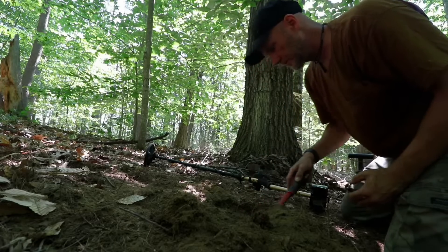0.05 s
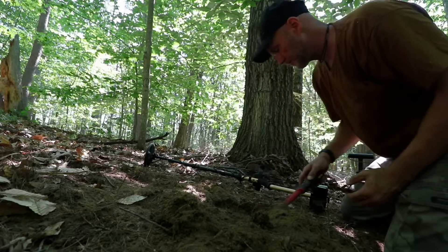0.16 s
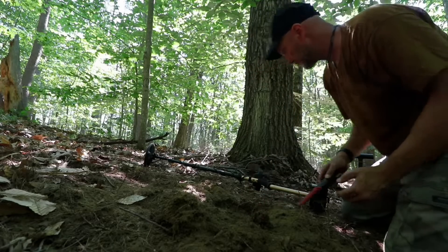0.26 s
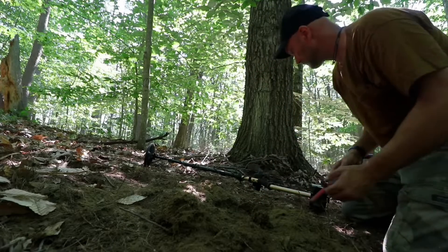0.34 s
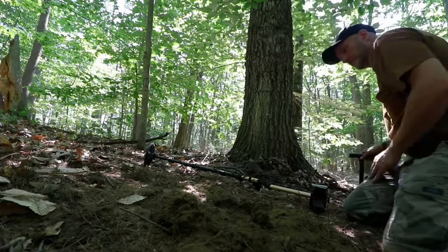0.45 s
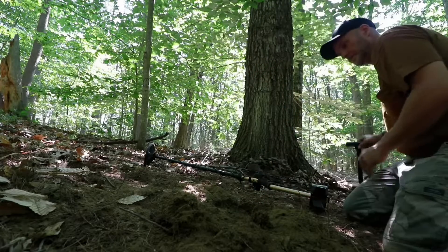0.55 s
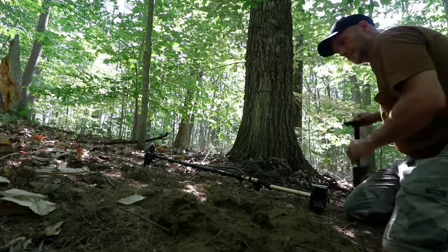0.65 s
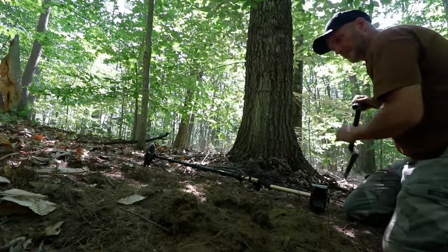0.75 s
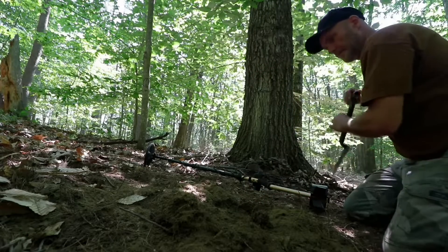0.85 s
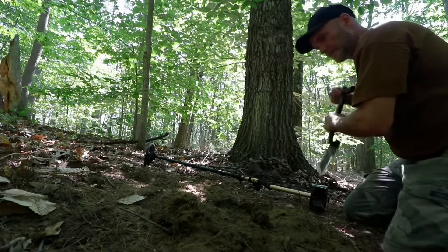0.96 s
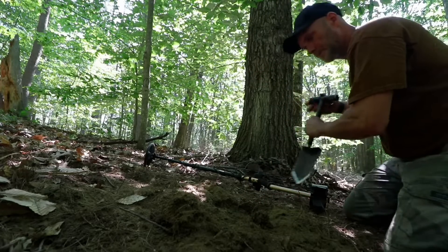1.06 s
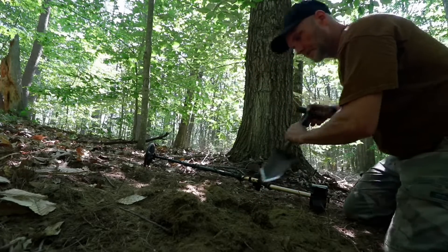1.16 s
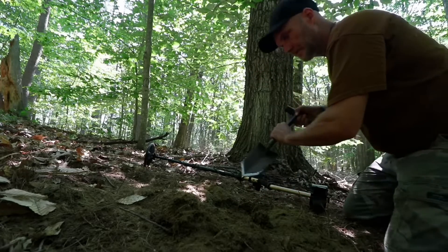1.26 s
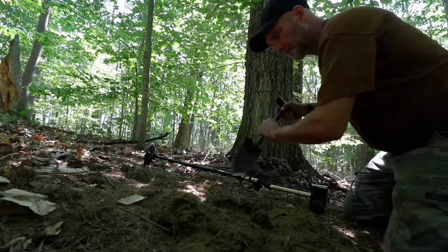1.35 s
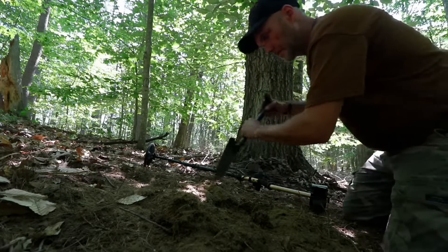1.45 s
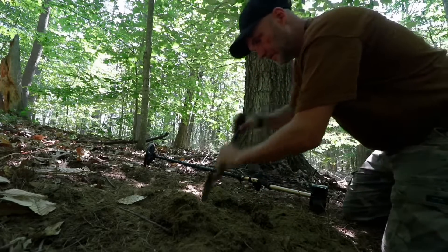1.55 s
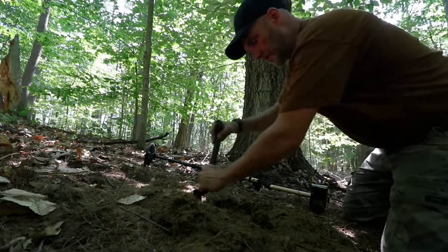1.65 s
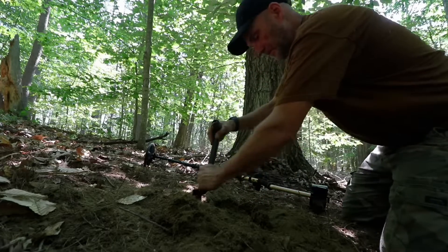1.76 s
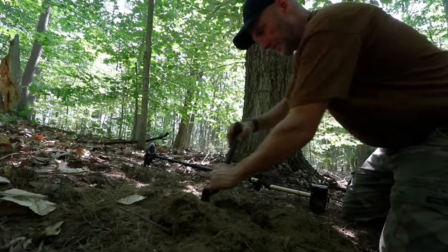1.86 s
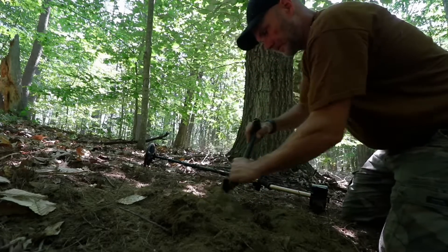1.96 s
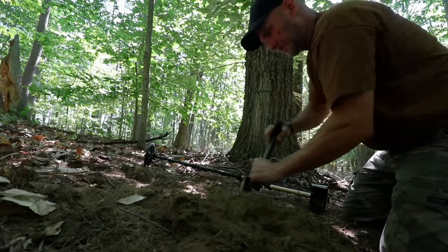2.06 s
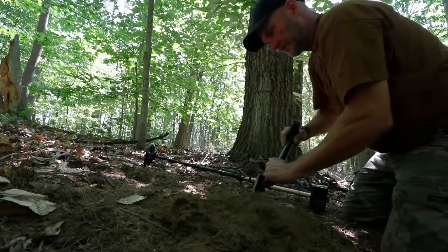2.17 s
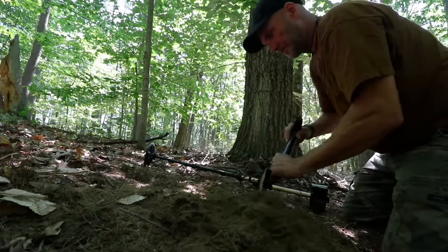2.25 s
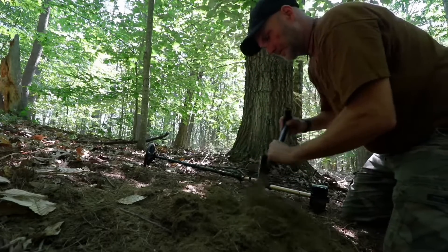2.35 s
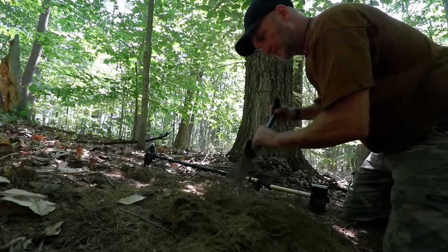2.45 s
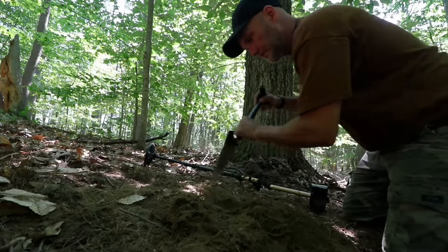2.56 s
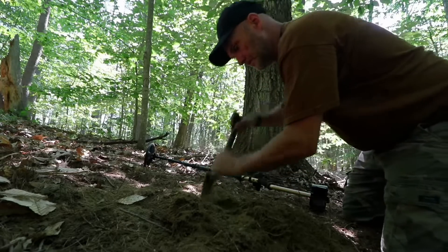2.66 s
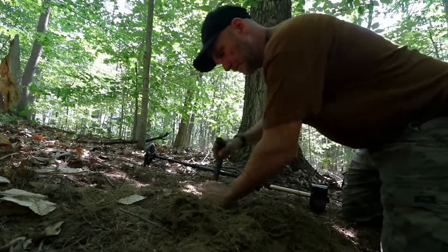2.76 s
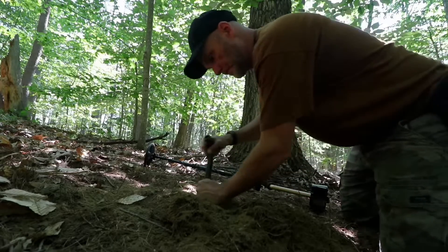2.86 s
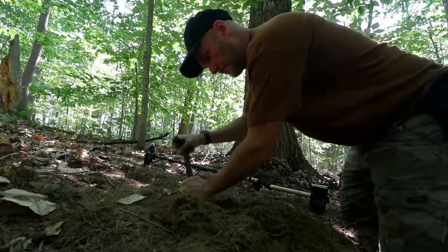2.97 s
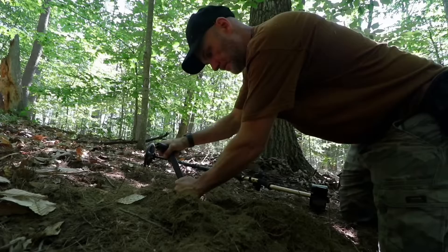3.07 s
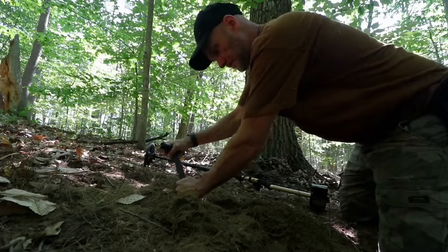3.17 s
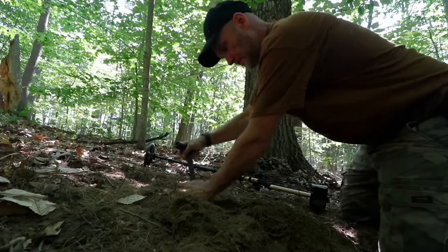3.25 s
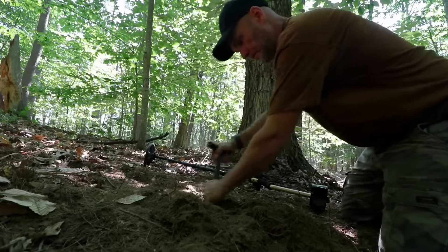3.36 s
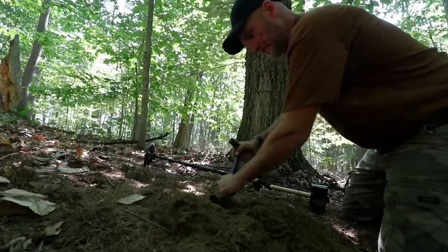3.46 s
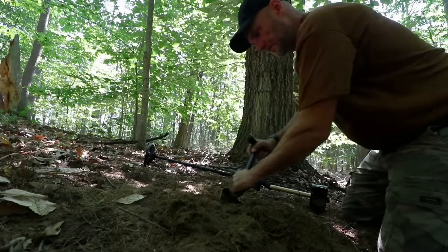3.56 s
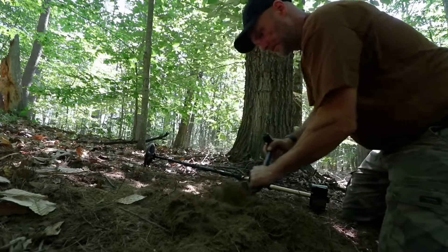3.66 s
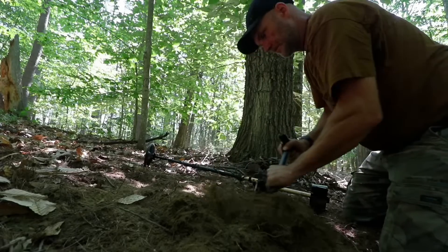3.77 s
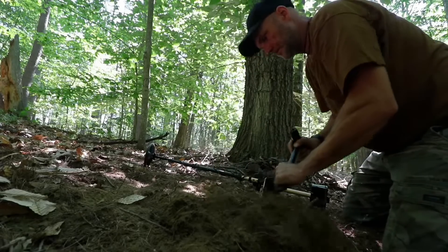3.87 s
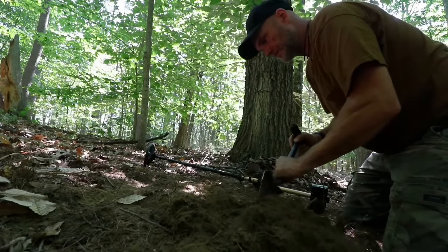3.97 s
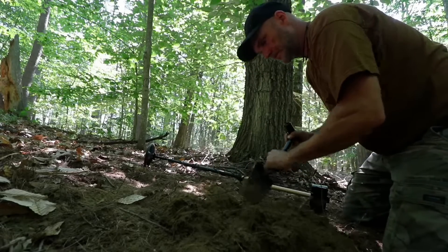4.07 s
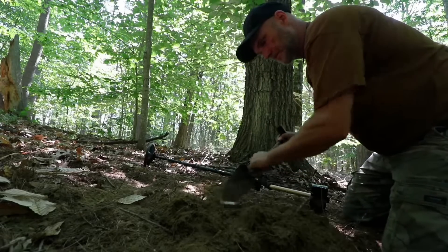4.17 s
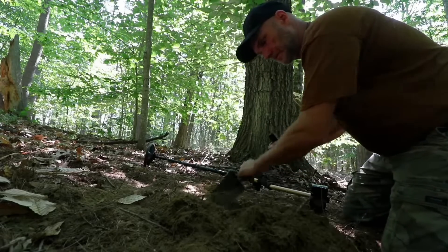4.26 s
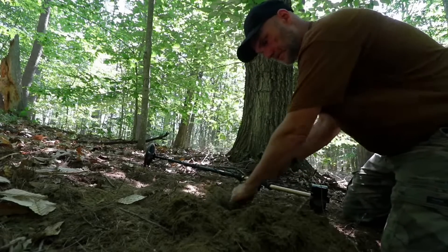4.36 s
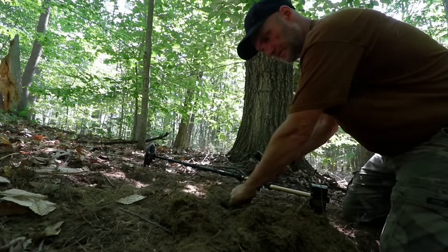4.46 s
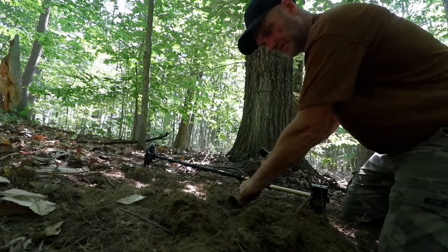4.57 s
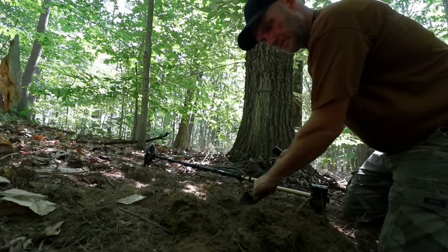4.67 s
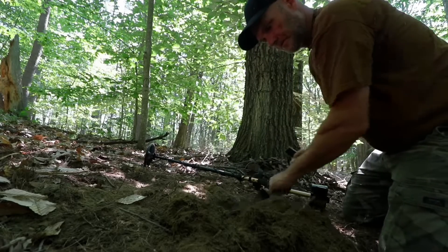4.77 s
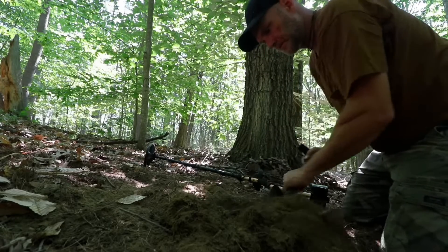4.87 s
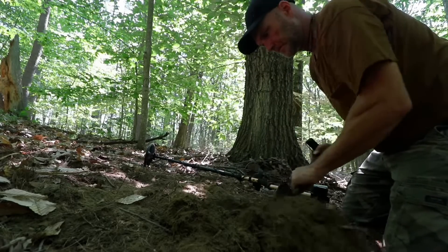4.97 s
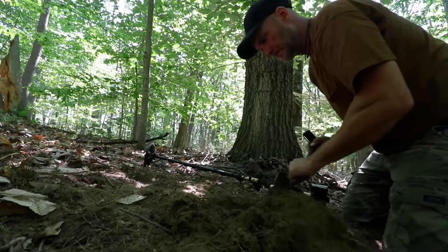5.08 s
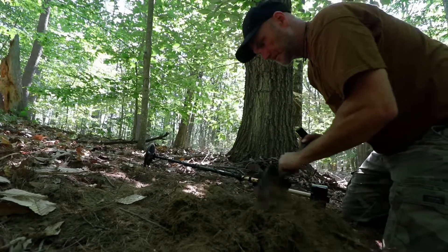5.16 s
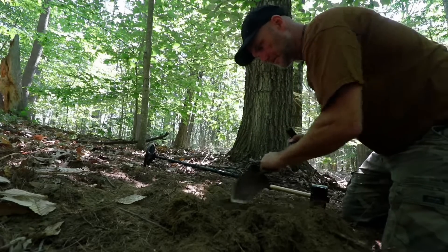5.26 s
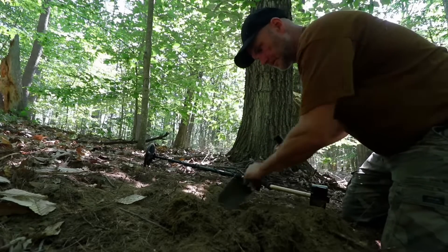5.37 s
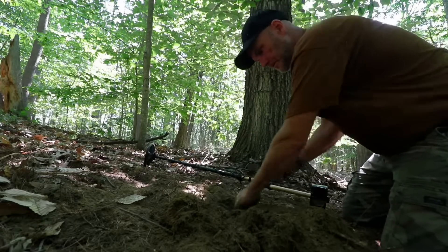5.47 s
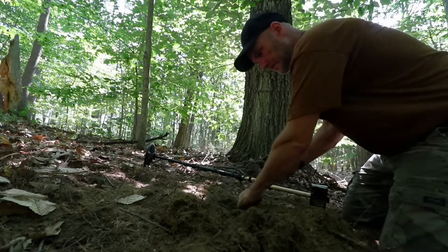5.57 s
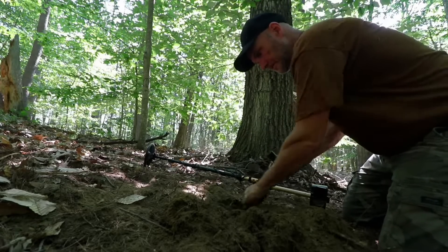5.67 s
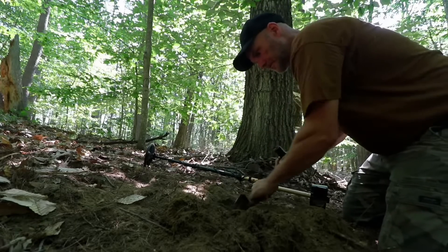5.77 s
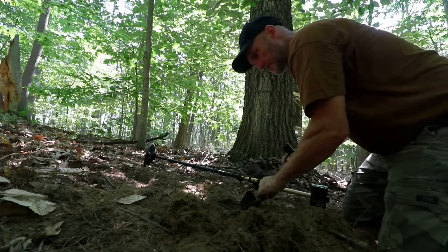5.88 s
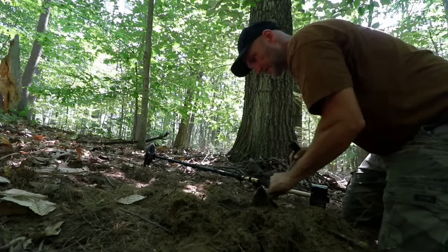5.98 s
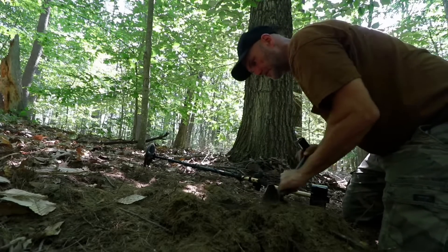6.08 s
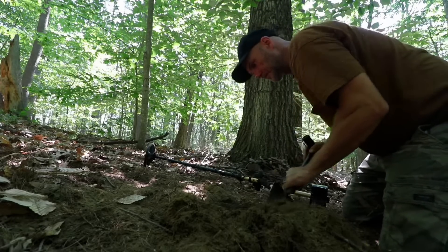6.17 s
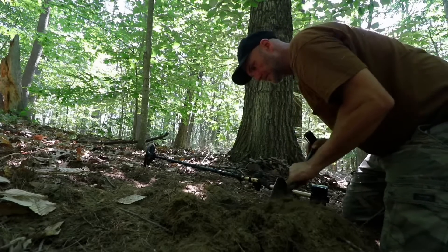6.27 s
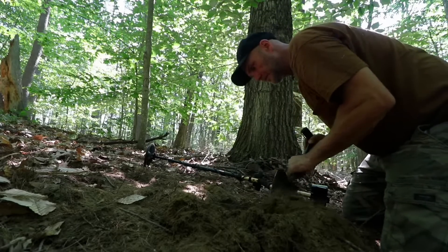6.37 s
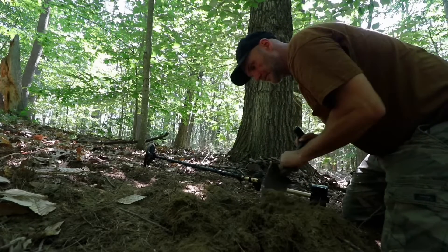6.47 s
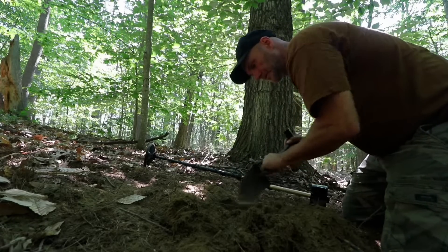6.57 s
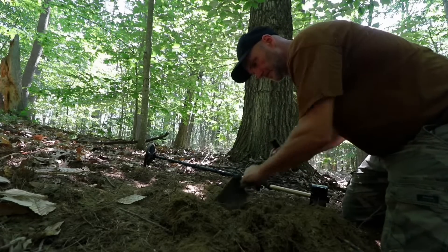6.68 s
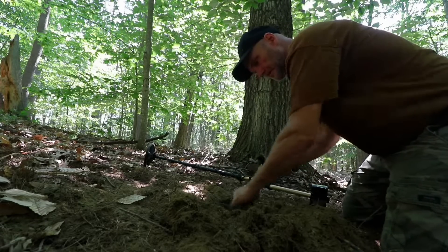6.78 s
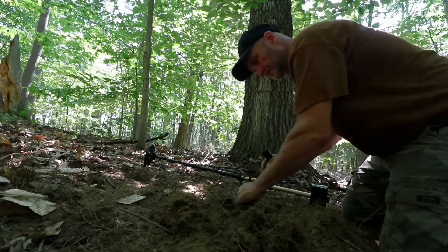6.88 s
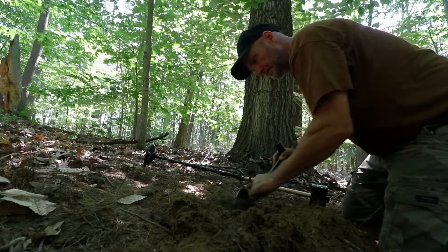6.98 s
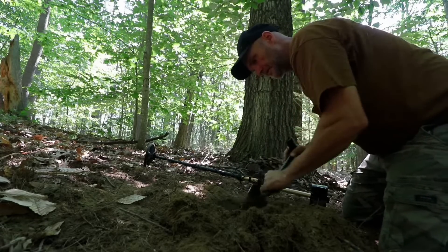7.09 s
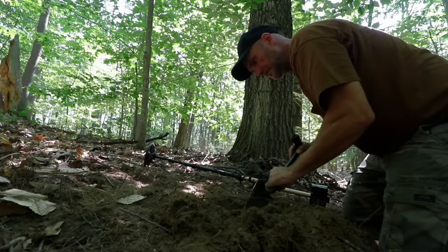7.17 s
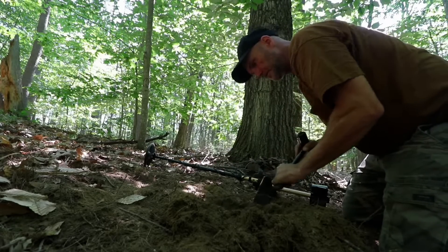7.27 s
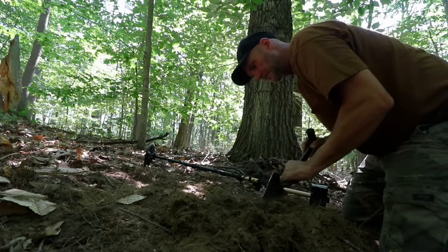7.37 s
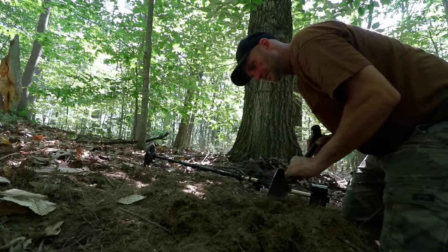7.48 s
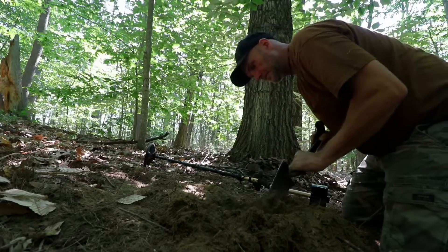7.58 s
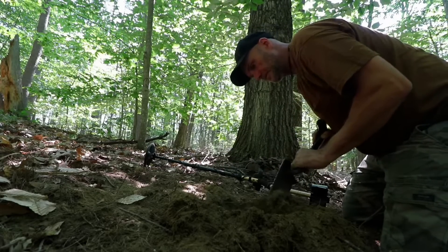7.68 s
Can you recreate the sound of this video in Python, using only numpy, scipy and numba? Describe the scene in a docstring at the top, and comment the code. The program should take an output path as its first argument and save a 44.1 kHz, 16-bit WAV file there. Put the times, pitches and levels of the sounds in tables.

```python
"""Spade in stony woodland soil

A short steel spade chops, levers and scrapes stony soil a metre from a microphone on the ground.
Stones excite the blade's modes, which ring long in air and short in soil; random grit grinds along it.
Thuds are decaying swings of sagging pitch, with a low shudder under them. Filtered noise gives leaves and
air, insects near 3.5 kHz and a faint wavering hum; two short sine whistles sound. Gain ducks on loud sound."""
import sys
import numpy as np
from scipy import signal
from scipy.fft import rfft, irfft, next_fast_len
from scipy.io import wavfile
from scipy.ndimage import uniform_filter1d
from numba import njit

SR = 44100
rng = np.random.default_rng(int(sys.argv[2]) if len(sys.argv) > 2 else 0)


def materialize(psi):
    """Save the field psi as 16-bit PCM at rate SR to the path in sys.argv[1].

    A 1-D psi becomes a single channel; in a 2-D psi each row is a channel.
    """
    bounded = np.clip(np.atleast_2d(psi).T, -1, 1)
    quanta = np.round(bounded * 32767).astype(np.int16)
    wavfile.write(sys.argv[1], SR, quanta)


N = 340893

# All levels are those ahead of the gain control.
# Modes of the spade, handle first. Each row: nominal pitch in Hz, relative level in dB, longest t60 in s (in air).
BLADE_MODES = [(484, -5, .04), (670, -6, .04), (915, -4, .06), (1350, -6, .07), (1540, -7, .17),
               (2205, -3.5, .2), (2555, -4, .27), (3460, -7, .1), (4075, -10, .2), (4560, -13, .15),
               (5115, -4, .15), (5380, -9, .2), (5780, -14, .12), (6630, -5, .25), (7740, -12, .15),
               (8310, -14, .1), (9265, -16, .15), (10070, -13, .1), (11200, -18, .07), (11940, -16, .1),
               (13500, -15, .06), (13880, -22, .06)]
# Stones against the blade in soil. Each row: start in s, clink peak in dB, knock in dB re clink,
# sizzle in dB re clink, then one or more pitches in Hz that the struck spot favours.
SOIL_BLOWS = [(0.9173, -31.5, -28, -27, 3500), (1.561, -10, -3.5, -11, 3380),
              (1.5643, 3.5, -11, -7, 2275, 3460), (1.5847, -10, -1.5, -29, 4000),
              (1.5996, -16, -26, -4, 2400), (1.644, -24.5, -19, -23, 1740), (1.833, -39, -9, -14, 2260),
              (1.943, -35.5, -20, 11, 3700), (1.9587, -28, 2, -31, 2360),
              (2.688, 5, -8, 4.5, 2600, 5115, 6630), (2.6965, 0.5, -17, -43, 3960),
              (2.709, -32, 6, -22, 4000), (3.2504, -29.5, -2, -29, 3160), (3.2687, -34.5, 6, -21, 2090),
              (3.299, -32, -27, -27, 2060), (3.318, -29.5, -20, -21, 2020), (3.4619, -25.5, 2, -12, 2900),
              (3.475, -14, -2, -29, 2930), (3.493, -20.5, -2, -6, 3000), (3.5323, -18.5, -32, -2, 3120),
              (3.538, -19, -25, -15, 3230), (3.546, -17, -25, -15, 3200), (3.553, -20, -34, -28, 3240),
              (3.6208, -10.5, -4, -8.5, 2360), (3.886, -36, -20, -6, 3200), (3.965, -29, -14, -8, 1690),
              (4.3597, -0.5, -15, -19, 1540, 3460, 4560), (4.365, -3, -20, -21, 2300, 4560, 1540),
              (4.372, -12, -25, -18, 1550, 3460), (4.3974, -21, -10, -36, 1510, 3400),
              (4.5408, -23, -12, -5, 1600), (4.6254, -26, -7, -7, 1520), (4.6726, -19, -2, -29, 1620),
              (4.7168, -37.5, 3, 12, 1560), (5.056, -30, -21, -16, 3020), (5.4637, -13, -14, 0, 3300),
              (5.4665, -5, -25, 5, 3300, 6630, 9265), (5.472, -10, -11, -7, 2480), (5.485, -20, 1, 1, 3300),
              (5.501, -25, -1, -3, 3300), (5.5978, -24, -6, -25, 1330), (5.7517, -37, 6.5, 8.5, 1240),
              (5.61, -26, -1, -28, 1380), (5.9576, -22, 4.5, -7, 1530), (5.971, -35, -5, -25, 1500),
              (6.031, -27, -18, -25, 1440), (6.204, -51, -18, 19.5, 4450), (6.2548, -34, 0.5, 1, 5270),
              (6.2981, -28.5, -3, 2, 1300), (6.323, -25, -27, -7, 2350), (6.348, -27.5, -5, 4, 5360),
              (6.7781, 3, -6, -5, 3470), (6.783, -8, -14, -6, 5400, 1540), (6.802, -6, -10, -9, 1550),
              (6.8724, -15.5, -36, -9, 2940), (6.897, -21, -7, -4, 2900, 5400),
              (6.854, -19, -22, -20, 3000), (6.916, -21.5, -12, -6, 2980), (6.987, -22.5, -21, 8, 8300),
              (6.9974, -16, -22, -1.5, 6950, 5400, 2900), (7.033, -22, -12, -6, 2380, 7000, 5400),
              (7.05, -28, -15, -8, 3000), (7.113, -21, 2.5, -7, 1450), (7.1232, -10.5, -6, -15, 2320),
              (7.153, -17, -2, -5, 2360), (7.1616, -10, -3, -10, 2640, 5400), (7.179, -23, -16, 6, 2400),
              (7.1919, -14, -8, -6, 1440), (7.222, -26.5, 8.5, -3, 1530), (7.244, -19.5, -26, -31, 2450),
              (7.3, -33, -25, -2, 1550), (7.311, -30, -10, -2, 1500), (7.368, -35, -14, -12, 2300),
              (7.456, -27, -1, 1.5, 2330), (7.4917, -25, -4, 2, 5300), (7.5047, -15.5, -2, 1, 2300),
              (7.5345, -21, -3, 4, 3430, 6630), (7.5621, -8, -6, -9, 2200, 484),
              (7.569, -7, -9, -12, 2220, 2555), (7.5825, -17, -16, -7, 2300), (7.594, -25, -16, 3, 6630),
              (7.625, -17, -4, -5, 1350, 915, 5115), (7.648, -18, -2, -9, 2110),
              (7.6654, -11, -15, -3, 1330, 5115, 4075), (7.6865, -17.5, -9, 2, 3360),
              (7.6997, -25, -12, 4, 3430), (7.711, -22.5, -2, 3.5, 6550)]
# Light taps while the blade hangs free and rings on. Columns as for SOIL_BLOWS.
FREE_TAPS = [(0.5107, -43, -24, -14, 5120), (0.53, -41, -20, -12, 4075), (0.5444, -40.5, -7, -7, 2580),
             (1.1358, -34.5, -18, -8, 1540), (1.313, -47, -20, -18, 2205), (1.395, -44, -15, -15, 1547),
             (2.4244, -33, -25, -4, 2205, 2555, 5750, 7740, 11940), (2.499, -50, -4, 2, 7740, 11940),
             (2.5114, -50, -4, 2, 6620, 9265), (3.968, -34, -6, -25, 2210),
             (3.9938, -31, -23, -20, 2205, 2555), (4.02, -39, -15, -20, 4075), (5.175, -36, -16, -24, 4075),
             (5.135, -40, -20, -20, 2555), (5.1602, -33.5, -25, -17, 2550),
             (5.2, -38, -9, -1, 2205, 4075, 7740, 9265, 11940), (6.3994, -52, -4, -1, 6620)]
# Blade and clods landing, felt through the ground. Each row: start in s, level in dB, nominal pitch in Hz.
GROUND_THUDS = [(1.575, -10, 122), (1.591, -6.5, 145), (1.614, -12.5, 120), (1.963, -27.5, 114),
                (1.997, -21.5, 105), (2.699, -9, 160), (2.73, -13.5, 111), (2.903, -28.5, 145),
                (3.247, -36, 174), (3.461, -16, 224), (3.468, -21, 252), (3.615, -25, 130),
                (3.85, -23.5, 414), (4.348, -26, 245), (4.546, -22, 174), (4.672, -16.5, 157),
                (5.472, -14.5, 127), (5.597, -19, 450), (5.607, -22, 400), (5.618, -26, 500),
                (5.65, -32, 300), (5.697, -19, 500), (5.681, -18.5, 524), (5.7253, -17.5, 520),
                (5.753, -20, 535), (5.865, -23, 746), (5.88, -23.5, 254), (5.912, -11.5, 408),
                (5.92, -18.5, 168), (5.956, -31, 60.6), (5.9575, -19, 480), (6.779, 0, 670),
                (6.786, -1, 650), (7.033, -18, 190), (7.113, -19, 137), (7.167, -25, 69.6)]
# Shudders of the ground after heavy loads. Each row: strongest at s, level in dB.
GROUND_SHUDDERS = [(.9, -44), (1.63, -25), (2.762, -33), (2.857, -32), (3.6, -40), (4.7, -36), (6.82, -31),
                   (7.17, -46)]
# Strokes through the soil. Each row: strongest at s, rise in s, fall in s, crumbling in dB,
# scraping in dB, fine grit in dB, share of power through steel 0-1.
SOIL_STROKES = [(0.526, 0.27, 0.2, -69, -43.5, -47.5, 0), (1.963, 0.92, 0.73, -43, -42.5, -57, 0.1),
                (2.34, 0.49, 0.23, -57, -47, -52.5, 0.06), (2.78, 0.033, 1, -70, -40.5, -54, 0.16),
                (2.988, 0.44, 0.2, -41.5, -58, -80, 0.04), (3.265, 0.077, 0.29, -40.5, -38.5, -54, 0),
                (3.485, 0.068, 0.094, -31.5, -39, -44, 0), (3.544, 0.029, 0.047, -50, -36, -38, 1),
                (3.63, 0.49, 0.47, -35.5, -41, -48, 0.02), (3.92, 0.22, 0.5, -55, -36.5, -43.5, 0.12),
                (4.0, 0.34, 0.63, -58, -44.5, -51, 0), (4.346, 0.05, 0.057, -57, -42, -46, 0.9),
                (4.555, 0.24, 0.26, -35.5, -31.5, -47.5, 0), (4.68, 0.73, 0.65, -41.5, -69, -52, 0),
                (5.09, 0.29, 0.7, -55, -46, -51.5, 0.06), (5.443, 0.008, 0.2, -56, -47, -38, 0.6),
                (5.617, 0.43, 0.55, -35, -40.5, -49, 0.2), (5.975, 0.37, 0.31, -37, -39, -43, 0.03),
                (6.27, 0.044, 0.099, -44, -41.5, -44, 1), (6.33, 0.092, 0.057, -33, -35, -38, 0.93),
                (6.93, 0.13, 0.13, -33, -37, -51, 0.4), (6.975, 0.26, 0.16, -38.5, -35.5, -35, 0.3),
                (7.04, .05, 0.13, -39, -35, -50, 0.9), (7.18, 0.19, 0.34, -39, -35.5, -43, 0.6),
                (7.26, 0.17, 0.057, -30.5, -57, -64, 0), (7.461, 0.087, 0.38, -36.5, -37.5, -41, 0.93),
                (7.519, 0.07, 0.4, -25, -25.5, -31, 1), (7.651, 0.25, 0.13, -23.5, -21, -24.5, 1)]
# Spectrum of far leaves and air. Each row: frequency in Hz, relative density in dB per Hz.
AIR_SPECTRUM = [(35, -13), (60, -40), (91, 3.5), (129, 3), (175, 0), (312, -5.5), (559, 0), (2360, -14),
                (3190, -8), (3500, -2), (3840, -13), (5580, -23.5), (15500, -25)]
# Hum bands. Each row: centre in Hz, level in dB.
HUM_BANDS = [(86.1, -56), (172.3, -55.5)]
# Faint short whistles. Each row: start in s, length in s, pitch in Hz, level in dB.
SHORT_WHISTLES = [(1.513, 0.031, 1820, -44), (1.65, .025, 1790, -44)]

AIR_DB, HUM_WIDTH_HZ = -48.5, 11.5
INSECT_HZ, INSECT_WIDTH_HZ, INSECT_DB = 3450, 85, -69

SHUDDER_HZ, SHUDDER_RISE_DB_S, SHUDDER_FALL_DB_S, SHUDDER_REST_DB = 35, 400, 200, -61
SWAY_DB, SWAY_FALL_DB_S = -11, 40  # the ground then sways on, weaker and slow to settle
THUD_SWINGS = 8.5  # nominal swings until 60 dB down
SNAP, SNAP_SWINGS = 0.36, 0.26  # first push: size re swing, decay to 1/e in swings

SPLIT_HZ = 230, 1200, 5000  # lower edges of the low, middle and high parts
SOIL_T60_S = .044  # soil damping of the scraped blade
BURIED_S, BURIED_BEND = (6.83, 7.28), 1.056  # levered deep in packed soil the blade rings higher: pitch ratio
STROKE_DROP_DB, STROKE_BEND = 29, 0.73  # drop after the rise or fall time; 1 = straight in dB
RUSTLE_DB = -58, -58, -69.5  # loose litter stirs all the time: crumbling, scraping, fine grit
SPRAY_DB, SPRAY_T60_S, SPRAY_STEEL = (-32.5, -31, -36), 0.2, 0.15  # grit thrown by blows, re clink
LEAD_DB, LEAD_T60_S = -10, 0.037  # hiss through litter just before each blow, re spray
GRIT_PER_S, GRIT_SPREAD_DB, GRIT_SOFT_HZ = 1800, 5.5, 2840
BUNCH_DB, BAND_BUNCH_DB = 1.7, 1.8  # grit bunches in all parts together, and in each direct part alone
EARTH_DB = 3  # rumble of shifting earth, re crumbling

BLOW_STEEL, TAP_STEEL = 0.3, 0.78  # base share of steel ring against crunch, 0-1
STEEL_PER_DB, HARD_DB = 0.03, -4  # blows harder than this ring the steel more
CRUNCH_TAIL_T60_S = 0.071
BLOW_RING_T60_S, TAP_RING_T60_S = .042, .27  # upper limits on mode t60
BLOW_GRIP_DB = 5.5  # spread of the soil's uneven damping
BLOW_SPOT_DB, TAP_SPOT_DB = 14.5, 17  # boost of favoured modes
BLOW_SPOT_WIDTH, TAP_SPOT_WIDTH = 0.027, .045  # in log frequency

DIP_S, DIP_IN_S, DIP_OUT_S = 0.415, 0.037, 0.02  # the whole sound fades down and back up
END_FADE_S, TOP_HZ = 0.011, 15725
GAIN_KNEE_DB, GAIN_POWER, GAIN_ATTACK_S, GAIN_RELEASE_S = -28.0, 0.29, 0.0014, .08


def undb(db):
    """Amplitude factor of a level in dB."""
    return 10 ** (np.asarray(db) / 20)


def level(x, db):
    """Scale to an RMS level in dB."""
    return x * undb(db) / np.sqrt(np.mean(x ** 2))


def band(x, lo_hz, hi_hz):
    """Butterworth band-pass."""
    return signal.sosfilt(signal.butter(2, [lo_hz, hi_hz], "bandpass", fs=SR, output="sos"), x)


def thirds(x):
    """Low, middle and high part; gentle slopes between them add up flat, the lowest bass is cut."""
    size = next_fast_len(len(x) + 2048)
    hz = np.fft.rfftfreq(size, 1 / SR)
    above = [hz ** 4 / (hz ** 4 + float(edge) ** 4) for edge in SPLIT_HZ] + [0]
    spectrum = rfft(x, size)
    return [irfft(spectrum * (a - b), size)[:len(x)] for a, b in zip(above, above[1:])]


def fade(t, t60):
    """Exponential decay, 60 dB per t60."""
    return np.exp(-np.log(1000) * t / t60)


def add(track, s, x):
    """Mix x into track from s seconds on."""
    i = int(s * SR)
    track[i:i + len(x)] += x[:N - i]


def walk(rate):
    """Random levels held 1 / rate s and slewed twice; spread near 1."""
    k = int(SR / rate)
    steps = np.repeat(rng.standard_normal(N // k + 1), k)
    return 1.47 * uniform_filter1d(uniform_filter1d(steps, k), k)[:N]


@njit
def follow(x, attack, release):
    """Envelope that rises fast and sinks slowly."""
    e, out = 0., np.empty(len(x))
    for i in range(len(x)):
        e += (abs(x[i]) - e) * (attack if abs(x[i]) > e else release)
        out[i] = e
    return out


def soft(x):
    """Contact lasts a moment, which dulls the top."""
    return signal.lfilter(*signal.butter(1, GRIT_SOFT_HZ, fs=SR), x)


def leaves():
    """Far leaves and air: shaped noise swelling slowly."""
    f = np.maximum(np.fft.rfftfreq(N, 1 / SR), 1)
    hz, db = np.transpose(AIR_SPECTRUM)
    shape = undb(np.interp(np.log(f), np.log(hz), db))
    air = irfft(rfft(rng.standard_normal(N)) * shape, N)
    return level(air, AIR_DB) * undb(.8 * walk(3))


def insects():
    """Insect song: a narrow noise band, throbbing irregularly."""
    half = INSECT_WIDTH_HZ / 2
    song = band(rng.standard_normal(N), INSECT_HZ - half, INSECT_HZ + half)
    return level(song * undb(2.0 * walk(34)), INSECT_DB)


def hum():
    """Blurred hum: noise bands narrow enough to waver as tones."""
    half = HUM_WIDTH_HZ / 2
    return sum(level(band(rng.standard_normal(N), hz - half, hz + half), db) for hz, db in HUM_BANDS)


def whistles():
    """Short sine tones under a rounded arch."""
    out = np.zeros(N)
    for s, length, hz, db in SHORT_WHISTLES:
        t = np.arange(0, length, 1 / SR)
        add(out, s, undb(db) * np.sin(np.pi * t / length) ** .5 * np.sin(2 * np.pi * hz * t))
    return out


def shudder():
    """The ground shakes at a fixed low pitch after heavy loads, over steady low noise."""
    out = np.zeros(N)
    t = np.arange(N) / SR
    for s, db in GROUND_SHUDDERS:
        before = SHUDDER_RISE_DB_S * (s - t)
        after = np.minimum(SHUDDER_FALL_DB_S * (t - s), SWAY_FALL_DB_S * (t - s) - SWAY_DB)
        out += undb(db - np.maximum(before, after)) * np.cos(2 * np.pi * SHUDDER_HZ * (t - s))
    rest = band(band(rng.standard_normal(N), 23, 55), 23, 55)
    return out + level(rest, SHUDDER_REST_DB)


def thuds():
    """A sharp push sets the soil swinging; the damped swing sags in pitch."""
    out = np.zeros(N)
    t = np.arange(SR // 4) / SR
    for s, db, hz in GROUND_THUDS:
        turns = hz * 0.78 * t + 0.64 * (1 - np.exp(-t * hz / 1.1))
        rise = np.minimum(t * hz / 0.14, 1)  # the push builds within a fraction of a swing
        snap = SNAP * np.exp(-t * hz / SNAP_SWINGS)
        swing = rise * fade(t, THUD_SWINGS / hz) * np.sin(2 * np.pi * turns)
        add(out, s, -undb(db) * (snap + swing))
    return out


def contact():
    """Grinding amplitude in three parts, via steel and direct: strokes swell and die, blows throw spray."""
    t = np.arange(0, N, 32) / SR
    steel = np.zeros((3, len(t)))
    direct = undb(RUSTLE_DB)[:, None] ** 2 + 0 * t
    for s, rise, fall, *dbs, share in SOIL_STROKES:
        distance = np.maximum((s - t) / rise, (t - s) / fall)
        power = undb(np.c_[dbs] - STROKE_DROP_DB * distance ** STROKE_BEND) ** 2
        steel = steel + np.clip(share, 0, 1) * power
        direct = direct + np.clip(1 - share, 0, 1) * power
    spray = 0
    for s, db, *_ in SOIL_BLOWS:
        lead = undb(LEAD_DB) * fade(abs(s - t), LEAD_T60_S)
        spray = spray + (undb(db) * np.where(t > s, fade(t - s, SPRAY_T60_S), lead)) ** 2
    spray = spray * undb(SPRAY_DB)[:, None] ** 2
    both = np.sqrt([steel + SPRAY_STEEL * spray, direct + (1 - SPRAY_STEEL) * spray])
    return [[np.interp(np.arange(N) / SR, t, row) for row in way] for way in both]


def grit_hits():
    """Grains catch and slip: random impulses of uneven size plus noise, in bunches."""
    hit = rng.random(N) < GRIT_PER_S / SR
    size = undb(GRIT_SPREAD_DB * np.minimum(rng.exponential(size=N), 2.8))
    grit = hit * rng.choice([-1, 1], N) * size
    return (level(grit, 0) + 0.68 * rng.standard_normal(N)) * undb(BUNCH_DB * walk(90))


def scraped_blade(grit):
    """Grit drives the soil-damped modes; burial crossfades to raised pitches."""
    ring = np.zeros(N)
    t = np.arange(N) / SR
    buried = np.clip(np.minimum(t - BURIED_S[0], BURIED_S[1] - t) / .02, 0, 1)
    for hz, db, air_t60 in BLADE_MODES:
        r = fade(1 / SR, 1 / (1 / air_t60 + 1 / SOIL_T60_S))
        for bend, weight in ((1, 1 - buried), (BURIED_BEND, buried)):
            w = 2 * np.pi * hz * bend / SR
            mode = signal.lfilter([np.sin(w)], [1, -2 * r * np.cos(w), r * r], grit)
            # the point of contact wanders, so each mode swells on its own
            ring += weight * undb(db + 2.4 * walk(35)) * mode
    return ring


def scrape():
    """Grit grinds along the blade, heard directly and through the steel, over an earth rumble."""
    grit = grit_hits()
    ring = scraped_blade(grit)
    steels, directs = contact()
    out = undb(EARTH_DB) * directs[0] * level(band(grit, 76, 298), 0)
    for a, b, steel, direct in zip(thirds(ring), thirds(soft(grit)), steels, directs):
        bunched = b * undb(BAND_BUNCH_DB * walk(60))
        out += steel * level(a, 0) + direct * level(bunched, 0)
    return out


def struck_modes(t, s, spots_hz, t60, favour_db, width, rough_db):
    """Decaying blade modes, strongest near the struck spot's pitches."""
    hz, db, air_t60 = np.transpose(BLADE_MODES)[:, :, None]
    held = hz * (BURIED_BEND if BURIED_S[0] < s < BURIED_S[1] else 1)
    near = np.max(np.exp(-(np.log(held / spots_hz) / width) ** 2), axis=1, keepdims=True)
    spot_db = favour_db * near + 3 * rng.standard_normal(hz.shape)
    bent = held * (1 + 0.00021 / t60 * rng.standard_normal(hz.shape))  # a firmer grip of soil detunes more
    # shifting soil grips and frees each mode, which roughens its ring
    grip_steps = rng.standard_normal((len(hz), len(t) // 64))
    grip = undb(rough_db * np.repeat(grip_steps, 64, axis=1))
    decay = fade(t, np.minimum(air_t60, t60))
    return np.sum(undb(db + spot_db) * decay * np.sin(2 * np.pi * bent * t) * grip, axis=0)


def stone_crunch(t):
    """A stone splinters: bunched noise with a fast and a slow decay."""
    bunches = np.repeat(rng.standard_normal(len(t) // 64), 64)
    splinters = rng.standard_normal(len(t)) * undb(4 * bunches)
    return splinters * np.minimum(t / 0.0019, 1) * (fade(t, 0.015) + 0.31 * fade(t, CRUNCH_TAIL_T60_S))


def blows(table, steel, t60, favour_db, width, rough_db, size):
    """A stone crunches against the blade for some milliseconds and drives its modes."""
    out, t = np.zeros(N), np.arange(size) / SR
    for s, clink_db, knock_db, sizzle_db, *spots_hz in table:
        modes = struck_modes(t, s, spots_hz, t60, favour_db, width, rough_db)
        crunch = stone_crunch(t)
        ring = signal.fftconvolve(crunch * fade(t, 0.027), modes)[:size]
        shard = band(crunch, 0.914 * spots_hz[0], 1.079 * spots_hz[0])  # the shard itself clinks briefly
        stone = soft(crunch) + 2.74 * shard
        share = np.clip(steel + STEEL_PER_DB * max(clink_db - HARD_DB, 0), 0, 1)
        for a, b, part_db in zip(thirds(ring), thirds(stone), (knock_db, 0, sizzle_db)):
            mix = np.sqrt(share) * a / abs(a).max() + np.sqrt(1 - share) * b / abs(b).max()
            add(out, s, undb(clink_db + part_db) * mix)
    return out


def scene():
    """Sum all sources, dip once, fade at the end; both channels alike."""
    t = np.arange(N) / SR
    background = leaves() + insects() + hum() + whistles()
    ground = shudder() + thuds()
    blade = blows(SOIL_BLOWS, BLOW_STEEL, BLOW_RING_T60_S, BLOW_SPOT_DB, BLOW_SPOT_WIDTH,
                  BLOW_GRIP_DB, size=4096)
    blade += blows(FREE_TAPS, TAP_STEEL, TAP_RING_T60_S, TAP_SPOT_DB, TAP_SPOT_WIDTH, 0, size=8192)
    dip = np.clip(np.maximum((DIP_S - t) / DIP_IN_S, (t - DIP_S) / DIP_OUT_S), .05, 1)
    end = np.clip((N / SR - t) / END_FADE_S, 0, 1)
    mono = (background + ground + scrape() + blade) * dip * end
    return np.array([mono, mono])


def record(dry):
    """Gain ducks on loud sound, the converter clips, hiss of opposite sign per channel joins, the top is cut."""
    loud = follow(dry[0], 1 / (GAIN_ATTACK_S * SR), 1 / (GAIN_RELEASE_S * SR))
    gain = np.minimum(1, undb(GAIN_KNEE_DB) / (loud + 1e-9)) ** GAIN_POWER
    hiss = level(band(rng.standard_normal(N), 6900, 15500), -68) * np.array([[1], [-1]])
    top_cut = signal.ellip(12, .2, 75, TOP_HZ, fs=SR, output="sos")
    return signal.sosfilt(top_cut, np.clip(dry * gain, -1, 1) + hiss)


dry = scene()
out = record(dry)
materialize(out)
```